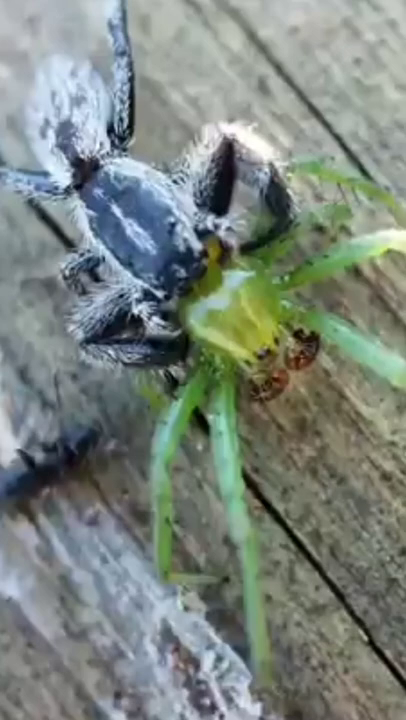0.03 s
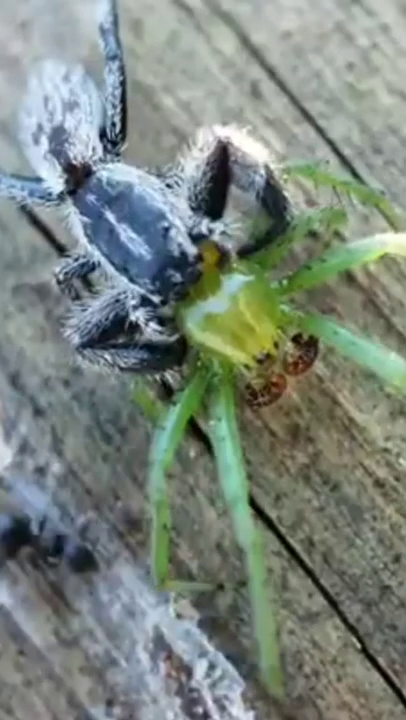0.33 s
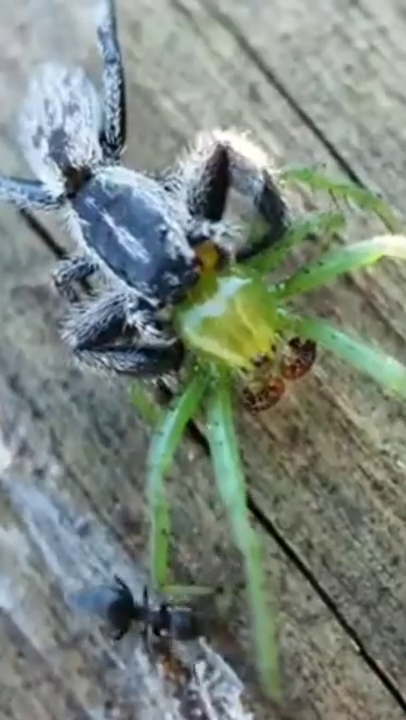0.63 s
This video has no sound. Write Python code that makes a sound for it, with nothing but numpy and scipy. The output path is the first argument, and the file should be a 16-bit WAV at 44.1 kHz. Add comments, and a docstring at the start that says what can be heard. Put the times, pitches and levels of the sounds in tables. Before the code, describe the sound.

Tyre roar of a passing car dulls as it draws away, with rumble and light wind.

```python
"""Outdoors, some way from a road, a car rolls by over a deep rumble and a faint hiss.
Its tyres roar and hiss, then grow dull as it draws away. Their sound also bounces off the road,
which sweeps a dip through the hiss. The engine drones low and picks up revs about halfway through.
Light wind buffets the left and right microphone openings. The sound cuts in just after the start."""
import sys
import numpy as np
from scipy import signal
from scipy.fft import rfft, irfft
from scipy.io import wavfile
from scipy.ndimage import uniform_filter1d

SR = 44100
rng = np.random.default_rng(int(sys.argv[2]) if len(sys.argv) > 2 else 0)


def store_wav(level_fs):
    """Save 16-bit WAV to argv[1]."""
    pcm = np.round(np.clip(np.atleast_2d(level_fs), -1, 1) * 32767)
    wavfile.write(sys.argv[1], SR, pcm.T.astype(np.int16))


N = 176400

# faint steady hiss: pitch_hz, level_db_per_hz
HISS_SPECTRUM = [(1000, -105), (4000, -112), (8000, -122), (10000, -128), (15000, -131)]
# road rumble: pitch_hz, level_db_per_hz
RUMBLE_SPECTRUM = [(12, -81), (24, -74), (35, -66), (52, -51.5), (70, -52.5), (95, -58), (130, -64.5),
                   (200, -67.5), (320, -78.5), (600, -113), (2000, -160)]
# tone of the wind: pitch_hz, relative_db
WIND_SPECTRUM = [(15, -35), (40, 3), (70, 1.5), (170, 2.5), (260, -2.5), (420, -12.5), (800, -22.5),
                 (2000, -61), (6000, -110)]
# puffs of wind: peak_s, width_s, left_db, right_db
GUSTS = [(0.388, 0.059, -37.5, -33), (0.52, 0.041, -25, -38), (0.661, 0.053, -31, -30),
         (0.793, 0.032, -31.5, -32.5), (1.466, 0.017, -33.5, -25), (2.554, 0.021, -41, -30),
         (3.557, 0.042, -40, -33), (3.774, 0.085, -33.5, -26)]
# engine speed and loudness: time_s, firing_rate_hz, base_level_db
ENGINE_REVS = [(.3, 49.08, -48), (.8, 50.14, -40), (1.1, 52.34, -39), (1.65, 55.12, -39),
               (1.85, 72.55, -38.5), (2.15, 75.95, -39.5), (2.5, 78.53, -33.5), (3.2, 78.49, -40),
               (3.5, 79.07, -32), (4.0, 79.7, -42.5)]
# exhaust tones: multiple_of_firing_rate, relative_db
EXHAUST_TONES = [(1, 1), (2, -10.5), (3, -15.5)]
# surges and lulls of the deepest exhaust tone: peak_s, boost_db
DRONE_SURGES = [(.82, 11), (.995, 9.5), (1.072, 9), (1.112, -8), (1.157, 13.5), (1.26, -7), (1.315, 9.5),
                (1.37, -16), (1.447, 10.5), (1.55, 7), (1.6, -5), (1.648, 12.5), (1.86, 9.5), (1.97, -6),
                (2.02, 11), (2.11, 12), (2.2, -10), (2.245, 9), (2.34, -12), (2.42, 7), (2.57, 2),
                (2.625, -15), (2.67, 1), (2.75, 3), (3.18, -6), (3.28, -11), (3.36, 4), (3.581, 6.5),
                (3.615, -1), (3.815, 11), (3.91, -7)]
# tyre noise before the drive-by shapes it: pitch_hz, left_db_per_hz, right_db_per_hz
TYRE_SPECTRUM = [(60, -75.5, -82.5), (246, -67, -64), (443, -65.5, -66.5), (744, -67.5, -67),
                 (955, -70.5, -62.5), (1205, -62.5, -57), (1340, -65.5, -58), (1393, -65.5, -55.5),
                 (1493, -73, -62), (1828, -70, -66.5), (2140, -75.5, -74.5), (2630, -77.5, -92.5),
                 (3090, -79.5, -73.5), (4390, -87.5, -84.5), (5170, -85, -101), (6400, -84.5, -99),
                 (8200, -98, -117), (10470, -101, -106), (15200, -107, -116)]
# tyres and their bounce off the road: time_s, gain_db, treble_db_per_octave, first_dip_hz, bounce_0_to_1
DRIVE_BY = [(.3, -7, 1.5, 8000, 0.56), (.55, -5, 2.5, 7500, 0.53), (.8, -3, 3.2, 6940, 0.83),
            (1.15, 0.5, 1.7, 5330, 0.65), (1.55, -1.2, 0.8, 4470, 0.47), (2.0, 1, -0.7, 4150, .5),
            (2.35, 0.4, -0.8, 3940, 0.44), (2.6, 0.64, -3.5, 3940, 0.47), (2.85, 1.7, -5, 3950, 0.48),
            (3.1, -2, -4.5, 3915, 0.54), (3.25, -2, -8.5, 4107, 0.27), (3.5, -2.5, -8, 4230, 0.4),
            (3.75, -4.3, -10, 4365, 0.6), (4.0, -3, -8.7, 4634, 0.58)]
# how alike the tyres sound on the left and right: pitch_hz, likeness_0_to_1
TYRE_LIKENESS = [(100, 1), (500, 0.72), (1300, 0.88), (2100, 0.78), (3200, 0.87), (5000, 0.1), (9000, 0.7)]
# how far the left side is ahead of the right: pitch_hz, lead_radians
LEFT_LEAD = [(300, 0), (600, 0.36), (900, 1.75), (1400, 3.5), (2100, 6), (3100, 7), (4600, 11.5),
             (7000, 22.5)]
# the right side is shaded from treble until the car comes round: time_s, treble_db_per_octave
RIGHT_SHADE = [(.3, -9), (.7, -8), (1.1, -1.5), (4.0, -0.5)]
# a peak in the roar that climbs as the car comes closer: time_s, pitch_hz, boost_db
CLIMBING_ROAR = [(.3, 710, 7.5), (.75, 685, 6.5), (1.2, 960, 0.5), (1.7, 1700, 3.5), (2.3, 1920, 1.5),
                 (3.0, 1899, 2)]
# the low part of the roar swells and sinks: time_s, boost_db
LOW_ROAR_SWELLS = [(.3, 0.5), (1.2, 1.5), (1.75, -1.5), (2.3, -4.5), (2.8, 2.5), (3.0, 3), (3.3, -5),
                   (4.0, 7.5)]


def gain(db):
    """Turn decibels into a number to multiply by."""
    return 10 ** (np.asarray(db) / 20)


def bell(x, centre, width):
    """A smooth bump of height 1."""
    return np.exp(-.5 * ((x - centre) / width) ** 2)


def curve(table, at, column=1):
    """Read a table column, joining its rows with straight lines."""
    rows = np.array(table, float)
    return np.interp(at, rows[:, 0], rows[:, column])


def by_pitch(table, hz, column=1):
    """Read a table column by pitch, with octaves evenly spaced."""
    rows = np.array(table, float)
    return np.interp(np.log(hz + 1), np.log(rows[:, 0]), rows[:, column])


def noise(spectrum):
    """Noise with the given level at each pitch."""
    hz = np.fft.rfftfreq(N, 1 / SR)
    white = rfft(rng.standard_normal(N))
    return irfft(white * gain(by_pitch(spectrum, hz)), N) * np.sqrt(SR / 2)


def wobble(per_s):
    """A smooth random drift around 0, with a typical size of 1."""
    hold = int(SR / per_s)
    steps = np.repeat(rng.standard_normal(N // hold + 1), hold)
    smooth = uniform_filter1d(uniform_filter1d(steps, hold), hold)[:N]
    return (smooth - smooth.mean()) / smooth.std()


def faint_hiss():
    """A steady hiss, separate on each side."""
    return np.array([noise(HISS_SPECTRUM), noise(HISS_SPECTRUM)])


def road_rumble():
    """A deep, wavering rumble, nearly the same on both sides."""
    likeness, waver_db = 0.85, 1.5
    separate = np.array([noise(RUMBLE_SPECTRUM), noise(RUMBLE_SPECTRUM)])
    rumble = np.sqrt(likeness) * noise(RUMBLE_SPECTRUM) + np.sqrt(1 - likeness) * separate
    return rumble * gain(waver_db * wobble(per_s=11))


def wind(t):
    """Swirling air hits each microphone opening in short gusts, and pops once on the right."""
    swirls = np.array([noise(WIND_SPECTRUM), noise(WIND_SPECTRUM)])
    swells = sum(gain([[left], [right]]) * bell(t, peak_s, width_s) for peak_s, width_s, left, right in GUSTS)
    sound = swirls / swirls.std() * swells
    pop_s = 1.4545
    puff = gain(-8.5) * bell(t, pop_s, width=0.00085)
    suction = gain(-16) * bell(t, pop_s + 0.0065, width=0.0017)
    sound[1] += puff - suction
    return sound


def engine(t):
    """The engine's firing makes low, throbbing exhaust tones; the drive shaft adds a faint hum."""
    jitter, throb_depth = 0.0057, 0.19
    firing_hz = curve(ENGINE_REVS, t) * (1 + jitter * wobble(per_s=18))
    phase = 2 * np.pi * np.cumsum(firing_hz) / SR
    tones = []
    for multiple, db in EXHAUST_TONES:
        # the throb shakes both loudness and timing
        throb = 1 + throb_depth * (wobble(per_s=24) + 1j * wobble(per_s=24))
        tones.append(gain(db) * (throb * np.exp(1j * multiple * phase)).real)
    surge_db = sum(db * bell(t, peak_s, width=0.02) for peak_s, db in DRONE_SURGES)
    exhaust = tones[0] * gain(surge_db) + sum(tones[1:])
    hum_hz = 128.3 + 28 * t  # rises with road speed
    hum = np.sin(2 * np.pi * np.cumsum(hum_hz) / SR) * gain(-52 + 2 * wobble(per_s=7.84))
    return np.sqrt(2) * (exhaust * gain(curve(ENGINE_REVS, t, column=2)) + hum)


def road_bounce(hz, t):
    """Sound bouncing off the road arrives late and partly cancels some pitches."""
    scatter_hz = 9300  # the rough road scatters hiss above this
    strength = curve(DRIVE_BY, t, column=4)
    bounce = strength / (1 + (hz / scatter_hz) ** 12)
    delay = np.exp(1j * np.pi * hz / curve(DRIVE_BY, t, column=3))
    return abs(1 + bounce * delay) / (1 + strength)


def roar_shape(hz, t):
    """One band of the roar climbs in pitch; a lower one swells and sinks."""
    octave, low_hz = np.log2(hz + 1), 340
    climbing_band = bell(octave, np.log2(curve(CLIMBING_ROAR, t)), width=0.205)
    low_band = bell(octave, np.log2(low_hz), width=0.3)
    return gain(curve(CLIMBING_ROAR, t, column=2) * climbing_band + curve(LOW_ROAR_SWELLS, t) * low_band)


def tyres():
    """Tread rolling on the road makes noise that reaches the left side first and dulls with distance."""
    treble_from_hz, waver_db = 1554, 0.63
    white = rng.standard_normal((2, N)) * np.sqrt(SR / 2)
    hz, t, (shared, separate) = signal.stft(white, SR, nperseg=1024)  # split by pitch and time
    hz = hz[:, None]
    treble_octaves = np.log2(np.maximum(hz / treble_from_hz, 1))
    likeness = by_pitch(TYRE_LIKENESS, hz)
    left = likeness * shared + np.sqrt(1 - likeness ** 2) * separate
    left *= np.exp(1j * curve(LEFT_LEAD, hz)) * gain(by_pitch(TYRE_SPECTRUM, hz))
    right = shared * gain(by_pitch(TYRE_SPECTRUM, hz, column=2) + treble_octaves * curve(RIGHT_SHADE, t))
    distance_gain = gain(curve(DRIVE_BY, t) + treble_octaves * curve(DRIVE_BY, t, column=2))
    shaped = np.array([left, right]) * road_bounce(hz, t) * distance_gain * roar_shape(hz, t)
    roar = signal.istft(shaped, SR)[1][:, :N]
    return roar * gain(waver_db * wobble(per_s=14))


def scene():
    """The car, rumble, wind and faint hiss together, in stereo."""
    t = np.arange(N) / SR
    return tyres() + engine(t) + road_rumble() + wind(t) + faint_hiss()


def record(dry):
    """Fade in quickly after a short silence and cut the highest treble."""
    start_s, fade_s, top_hz = 0.271, 0.034, 15200
    fade = np.clip((np.arange(N) / SR - start_s) / fade_s, 0, 1) ** 2
    treble_cut = signal.ellip(8, .2, 70, top_hz, fs=SR, output="sos")
    return signal.sosfilt(treble_cut, dry * fade)


dry = scene()
out = record(dry)
store_wav(out)
```